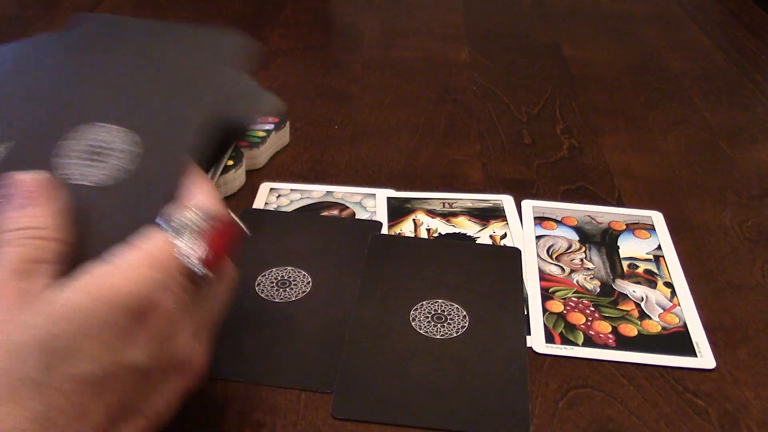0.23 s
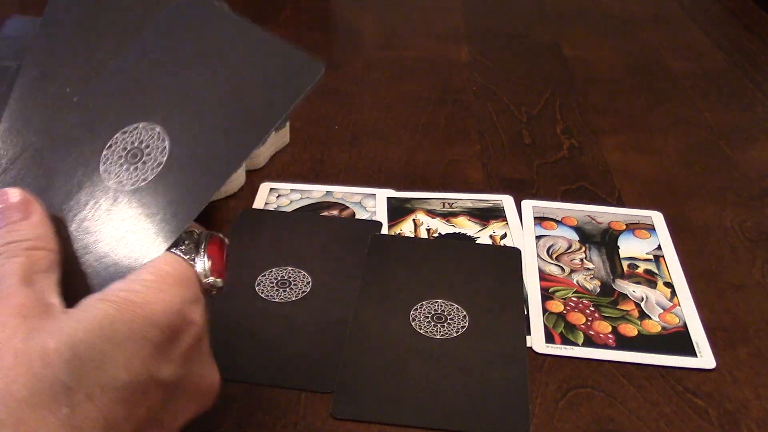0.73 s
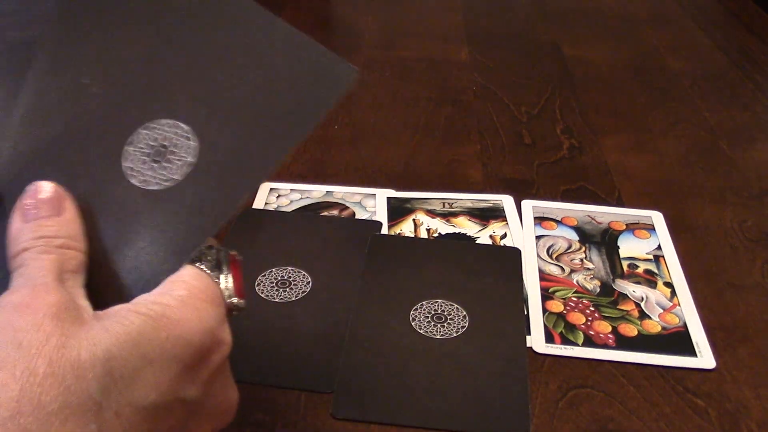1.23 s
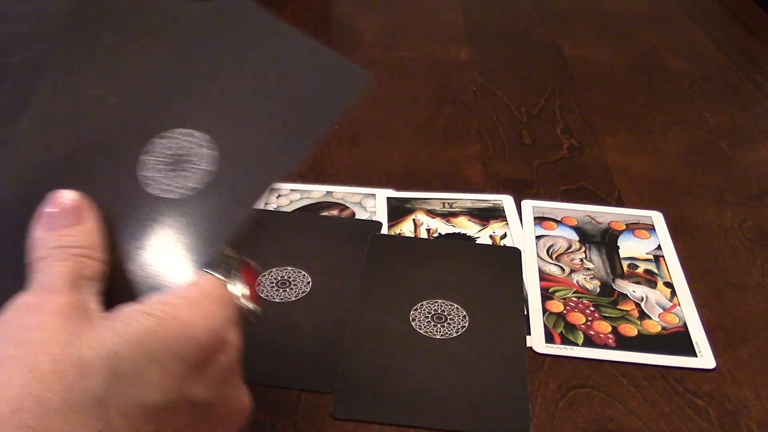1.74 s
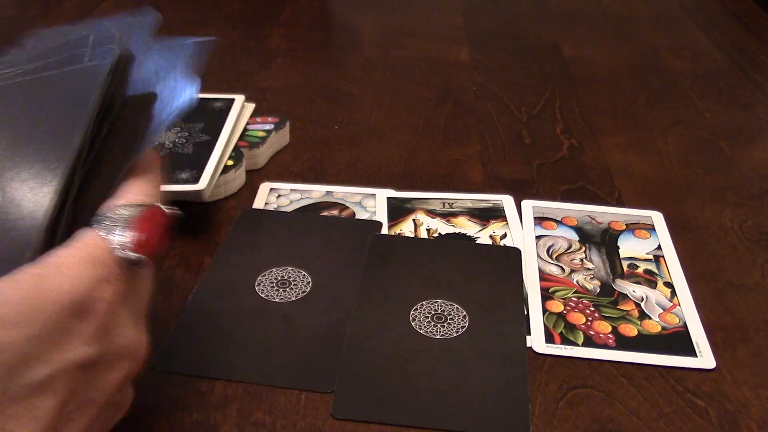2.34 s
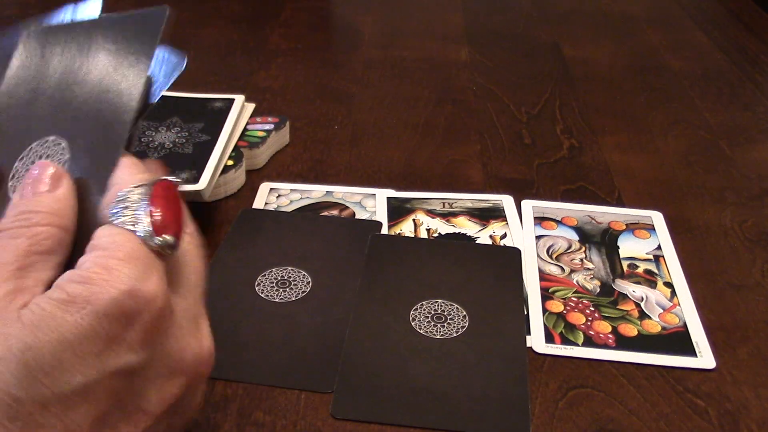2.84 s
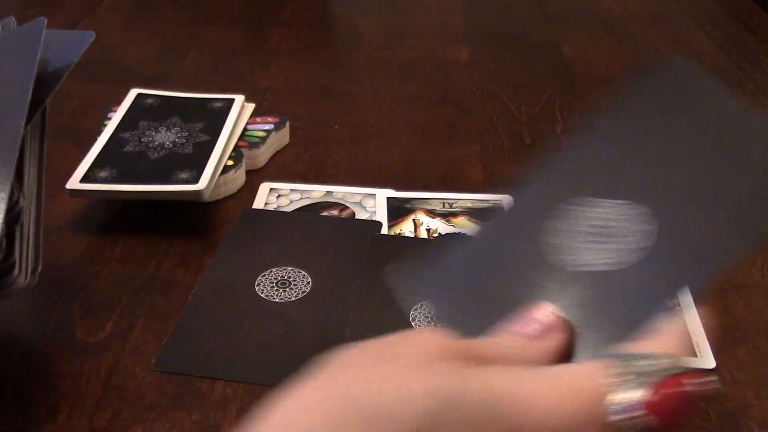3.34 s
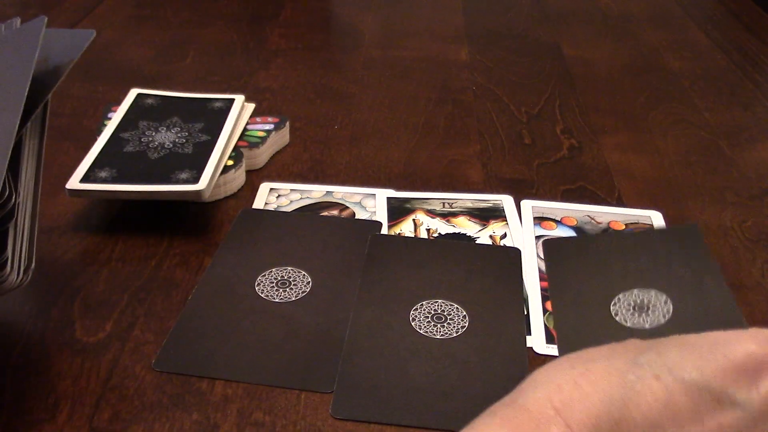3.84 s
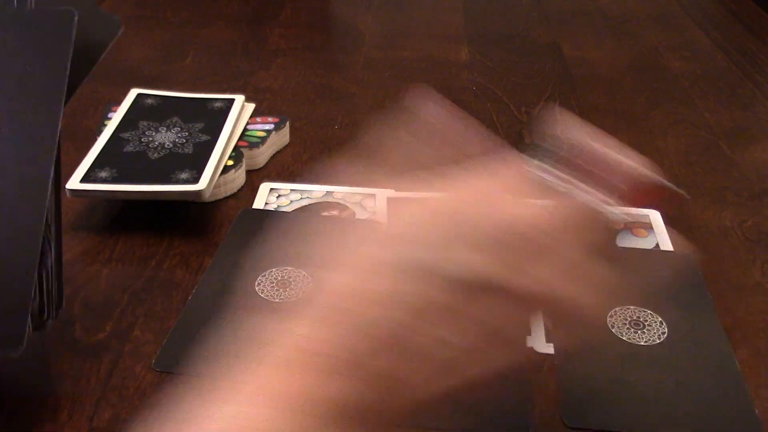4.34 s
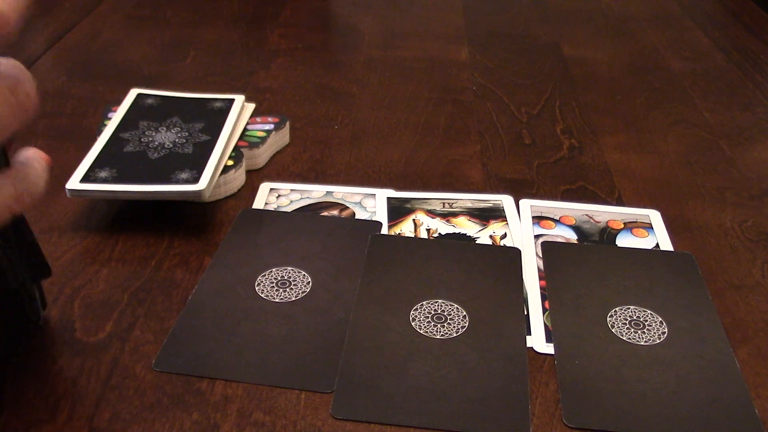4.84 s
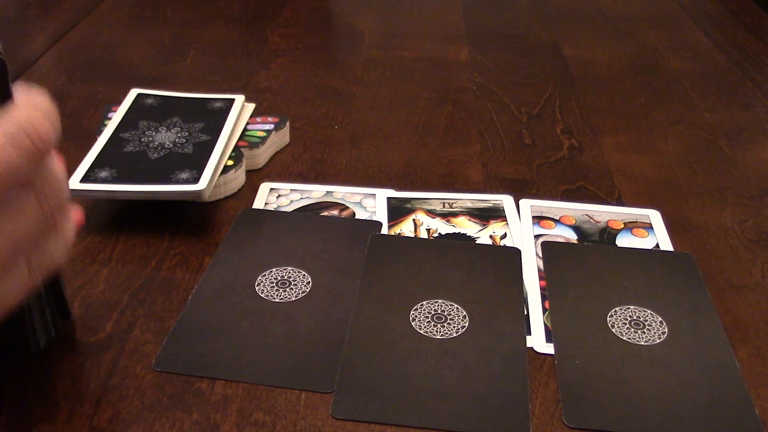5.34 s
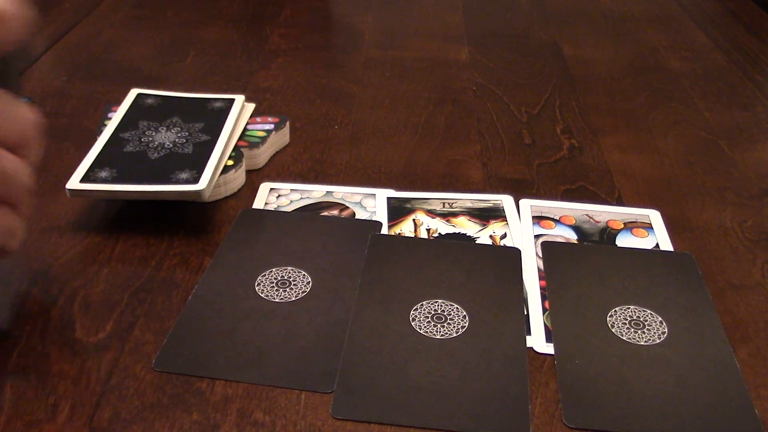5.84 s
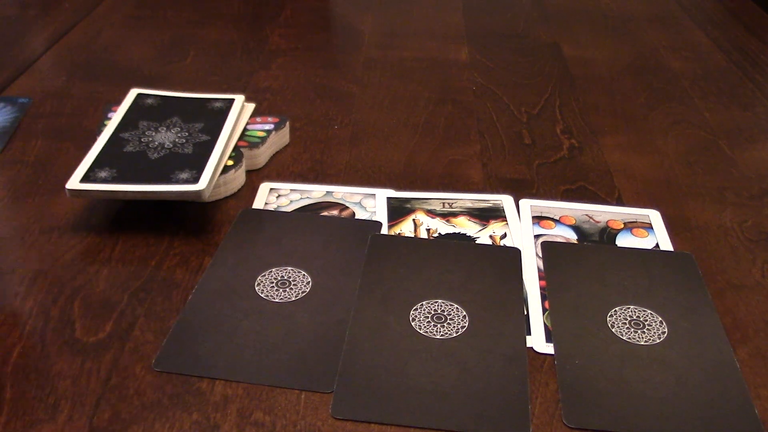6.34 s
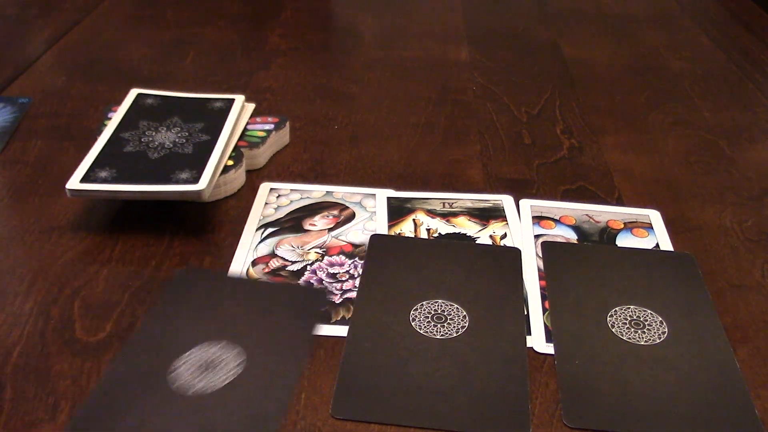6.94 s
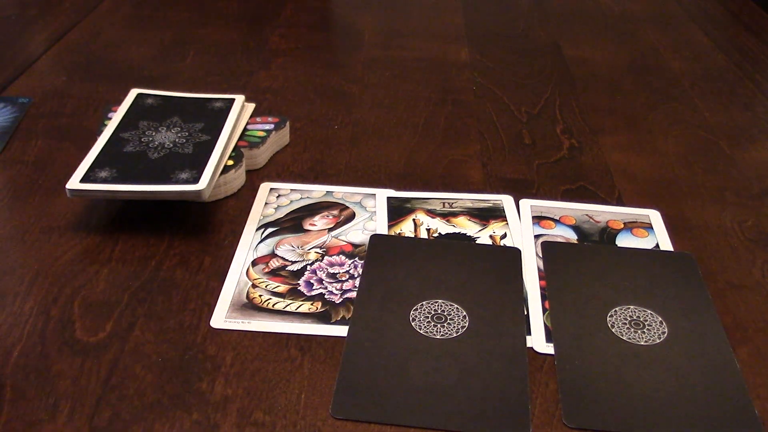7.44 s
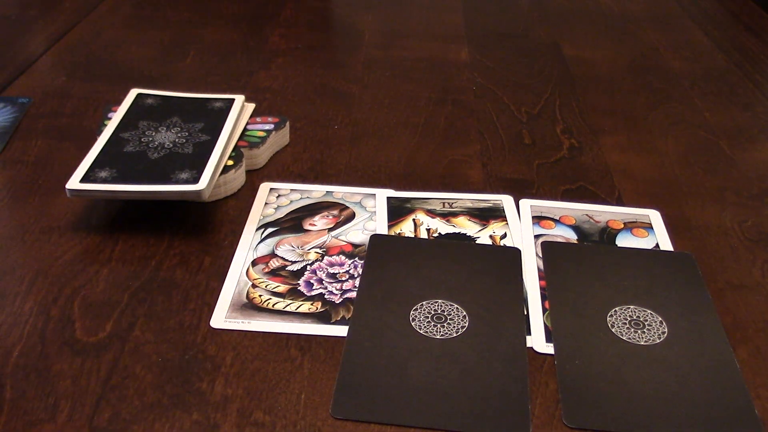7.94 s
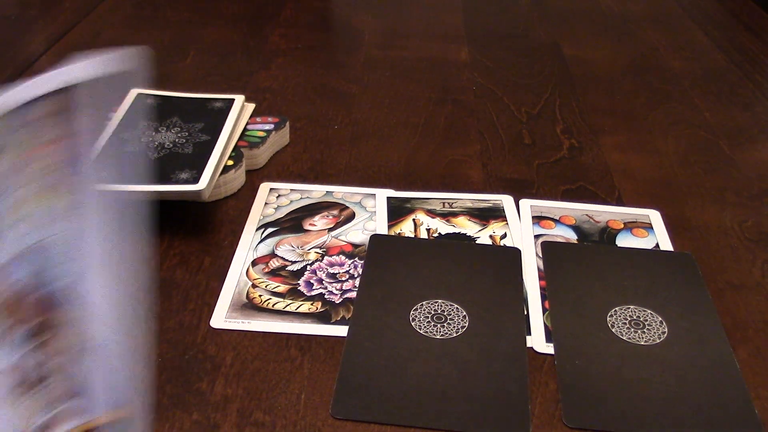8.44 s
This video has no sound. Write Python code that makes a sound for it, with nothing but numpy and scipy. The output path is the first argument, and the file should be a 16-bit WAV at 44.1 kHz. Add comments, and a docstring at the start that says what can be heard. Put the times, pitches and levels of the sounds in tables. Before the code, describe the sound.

In a quiet, humming room, cards rub, hiss and flick near the microphone, with light taps on a wooden table and a sharper slap. A short cluster of hollow, ringing knocks comes next, then more rustling and a firm thump as the deck is set down. One card is drawn away softly, a very high whine comes and goes, and small snaps finish.

```python
"""Tarot cards are dealt onto a wooden table, close by, in a quiet room with a steady hum and a faint whirr.
From the start, friction makes the cards rasp, hiss and swish off the deck, and bent edges snap free.
From 2.3 s, blows excite the modes of the table top; at 4.6 s something hollow is knocked and rings.
The deck thumps down at 6.2 s. One card is then drawn away over the others while a thin high whine
comes and goes (7.1 to 8 s), and a few light snaps end the scene."""
import sys
import numpy as np
from scipy import signal
from scipy.fft import rfft, irfft, next_fast_len
from scipy.io import wavfile

SR = 44100
rng = np.random.default_rng(int(sys.argv[2]) if len(sys.argv) > 2 else 0)


def wrap_up_sound(samples):
    """Save the sound to the file named by the first command line argument, as 16-bit audio."""
    columns = np.atleast_2d(samples).T
    # keep every value between -1 and 1, then stretch to whole-number steps
    tamed = np.clip(columns, -1, 1)
    steps = np.round(tamed * 32767).astype(np.int16)
    wavfile.write(sys.argv[1], SR, steps)


N = 383229
TIME = np.arange(N) / SR
RING_TIME = np.arange(SR) / SR


def amp(db):
    """Decibels to amplitude ratio."""
    return 10 ** (np.asarray(db) / 20)


def unit_energy(x):
    """Normalise to a total energy of one."""
    return x / np.sqrt(np.sum(x ** 2) + 1e-20)


def at_hz(points, hz):
    """Interpolate a table on a log-frequency axis."""
    table = np.array(points)
    return np.interp(np.log(np.maximum(hz, 1)), np.log(table[:, 0]), table[:, 1])


def add(track, s, sound):
    """Superpose a sound on a track at time s."""
    start = max(round(s * SR), 0)
    track[start:start + len(sound)] += sound[:max(N - start, 0)]


def tint(x, colour, tilt_db=0):
    """Minimum-phase filter with the given spectrum, tilted per octave above 500 Hz."""
    size = next_fast_len(2 * len(x), real=True)
    hz = np.maximum(np.fft.rfftfreq(size, 1 / SR), 20)
    gain_db = at_hz(colour, hz) + tilt_db * np.log2(np.maximum(hz, 500) / 2000)
    cepstrum = irfft(np.log(amp(gain_db)), size)
    cepstrum[1:size // 2] *= 2   # folding the cepstrum makes the filter causal
    cepstrum[size // 2 + 1:] = 0
    return irfft(rfft(x, size) * np.exp(rfft(cepstrum)), size)[:len(x)]


def soften(x, hz, order=2):
    """A compliant contact acts as a low-pass filter."""
    return signal.sosfilt(signal.butter(order, hz, fs=SR, output="sos"), x)


def resonate(x, hz, db):
    """A resonance lifts a narrow band around its frequency."""
    return x + (amp(db) - 1) * signal.lfilter(*signal.iirpeak(hz, Q=5.0, fs=SR), x)


def noise(colour):
    """Stationary noise with the given spectrum; rms 1."""
    size = next_fast_len(N, real=True)
    shaped = rfft(rng.standard_normal(size)) * amp(at_hz(colour, np.fft.rfftfreq(size, 1 / SR)))
    return unit_energy(irfft(shaped, size)[:N]) * np.sqrt(N)


def drift(rate):
    """Random fluctuation through `rate` values a second, with a spread near one."""
    return np.interp(TIME * rate, np.arange(N // 20), rng.standard_normal(N // 20))


def decay(t60, size=SR):
    """Exponential damping: 60 dB down after t60 seconds."""
    return np.exp(-np.log(1000) * RING_TIME[:size] / t60)


def contact(t60, scatter, size=SR):
    """An impulse followed by a decaying flurry of micro-impacts."""
    flurry = scatter * unit_energy(rng.standard_normal(size) * decay(t60, size))
    flurry[0] += 1
    return flurry


def ringing(modes):
    """Free vibration is a sum of damped modes, here alternating in sign; energy 1."""
    return unit_energy(sum((-1) ** k * amp(db) * decay(t60) * np.sin(2 * np.pi * hz * RING_TIME)
                           for k, (hz, db, t60) in enumerate(modes)))


# room noise spectrum: (frequency [Hz], relative level [dB])
AIR = [(25, -44), (45, -24), (80, -18.5), (110, -16.5), (170, -6), (260, -7), (400, -7.5), (600, -11),
       (800, -12.5), (1300, -21), (2500, -28.5), (6000, -35), (11000, -49.5), (16000, -48.5)]
# hum partials: (frequency [Hz], rms level [dB])
HUM = [(60, -75.5), (262, -61.5), (415, -53.5), (576, -63)]


def background():
    """Broadband room noise under a hum whose partials waver in amplitude and phase."""
    hum = sum(amp(db + 2.4 * drift(rate=7)) * np.sin(2 * np.pi * hz * TIME + 0.69 * drift(rate=7.3))
              for hz, db in HUM)
    return amp(-51.0) * noise(AIR) + np.sqrt(2) * hum


def whirr_pulse(period_s=.13347, peak_s=.054):
    """A rounded square wave between 0 and 1."""
    return .5 + .5 * np.tanh(2 * np.cos(2 * np.pi * (TIME - peak_s) / period_s))


def whirr(hz=5550, db=-71.5):
    """Amplitude modulation makes a faint electronic tone pulse."""
    return amp(db) * np.sqrt(2) * whirr_pulse() * np.sin(2 * np.pi * hz * TIME)


# restlessness of the fingers: (time [s], relative level [dB])
FIDGET = [(0, 0), (1.1, 0.5), (1.5, -2), (2.7, 5.5), (3.0, -4.5), (3.9, 0.5), (4.3, -0.5), (6.6, -8),
          (7.1, -0.5), (7.85, -3.5), (8.69, -1)]


def fidget():
    """Amplitude envelope of the small finger movements between strokes."""
    return amp(np.interp(TIME, *np.transpose(FIDGET)))


# spectrum of edge friction: (frequency [Hz], relative level [dB])
RASP = [(400, -28), (900, 4.5), (1700, 2), (3000, -2), (5000, -7), (8000, -10.5), (16000, -33.5)]


def ticks(per_second=8.2):
    """Edges catch and release under the fingers as a Poisson process."""
    caught = rng.random(N) < per_second / SR
    touches = caught * fidget() * amp(-37 + 5.5 * rng.standard_normal(N))
    tick = tint(contact(t60=.012, scatter=2.5, size=2048), RASP, tilt_db=-2.5)
    return signal.fftconvolve(touches, unit_energy(tick))[:N]


def flutter(t60, peel_s=0.00036, size=4096):
    """A noise transient builds as an edge peels free, then decays."""
    release = 1 - np.exp(-RING_TIME[:size] / peel_s)
    return unit_energy(rng.standard_normal(size) * release * decay(t60, size))


# card edges snapping: (time [s], level [dB], flutter T60 [s], tilt [dB/octave], room send [dB],
# card resonance [Hz])
SNAPS = [(0.1336, -6, 0.032, -0.5, -8.5, 2280), (0.1784, -9, 0.0036, -2.5, -8, 670),
         (0.4473, -7.5, 0.03, -2, -11, 2920), (0.555, -17.5, 0.013, -3.5, -7, 3150),
         (0.626, -36, .005, 9, -13, 12000), (1.999, 1.5, 0.011, 0.5, -12.5, 4130),
         (2.26, 0, 0.041, -2.5, -3.5, 2680), (2.276, -0.5, 0.01, -2, -4.5, 3930),
         (2.279, -1, 0.014, -1.5, -12, 1400), (2.2851, -3.5, 0.035, -0.5, -19, 2810),
         (2.41, -26, .005, 11, -18, 12000), (2.5729, -17, 0.035, -3.5, -4, 1520),
         (2.6206, -13, 0.0062, -3.5, -21, 2970), (2.8365, -16, 0.028, -1.5, -11, 2580),
         (3.1637, -1, 0.0039, -3, -20, 10000), (3.1677, 4, 0.012, -3, -9.5, 734),
         (3.28, -13, .012, -1.5, 0.5, 1600), (3.4433, -16, 0.035, 1.5, -19, 5030),
         (3.4513, -14.5, 0.011, -3, -4, 5070), (3.523, -16.5, 0.037, -2, -3.5, 1290),
         (3.753, -20.5, 0.023, -2, -19, 2830), (3.803, -14, 0.022, -1.5, -6.5, 2530),
         (4.098, 9, 0.0055, 1.9, -11.5, 5650), (4.101, 6.5, 0.0077, 0.5, -3.5, 890),
         (4.13, -2, 0.018, 1.5, -9, 820), (5.352, -8.5, 0.043, 1.5, -8, 1450),
         (5.4062, -15, 0.017, 0, -24, 1230), (6.216, -10.5, .02, -1.5, -2, 1215),
         (6.682, -13, 0.01, 2, -7, 5060), (8.062, -26, .012, -3, -4, 1750),
         (8.108, -26, 0.011, -1, -4, 3200), (8.158, -27, 0.012, -1, -9, 5540),
         (8.222, -25.5, 0.017, -2, -14, 1900), (8.678, -17, 0.082, -3, 4, 4400)]
# snap spectrum: (frequency [Hz], relative level [dB])
SNAP_SPECTRUM = [(100, -11), (300, -1.5), (650, 4), (1300, 2.5), (3500, -1), (7000, -5), (11000, -6.5),
                 (16000, -27)]


def snaps():
    """A bent edge releases its elastic energy at once; each snap has the reflections of its own spot."""
    out = np.zeros(N)
    for s, db, t60, tilt_db, room_db, note_hz in SNAPS:
        note_db = 8.5 - 0.13 * db   # the resonance stands out more in light snaps
        snap = tint(flutter(t60), SNAP_SPECTRUM, tilt_db)
        click = tint(signal.unit_impulse(1024), SNAP_SPECTRUM, tilt_db + 0.11)
        tail = signal.fftconvolve(resonate(click, note_hz, note_db / 2), reflections())
        add(out, s, amp(db) * unit_energy(resonate(snap, note_hz, note_db)))
        add(out, s, amp(db + room_db) * unit_energy(tail))
    return out


# reverberation time of the room: (frequency [Hz], T60 [s])
ROOM_T60 = [(100, 0.83), (400, 0.86), (1500, 0.67), (5000, 0.76), (10000, .45), (16000, 0.1)]


def reflections():
    """Impulse response of a diffuse field, each octave decaying at its own rate; energy 1."""
    tail = np.zeros(SR)
    edges_hz = 62.5 * 2 ** np.arange(9)
    white = rng.standard_normal((2, SR))
    for k, (low, high) in enumerate(zip(edges_hz, edges_hz[1:])):
        band = signal.sosfilt(signal.butter(2, [low, high], "band", fs=SR, output="sos"), white[k % 2])
        tail += band * decay(at_hz(ROOM_T60, np.sqrt(low * high)))
    build_up = 1 - np.exp(-RING_TIME / 0.00067)
    return unit_energy(tail * build_up)


def room(x):
    """A stationary source reverberates by convolution with one impulse response."""
    return signal.fftconvolve(x, reflections())[:N]


def stroke(s, db, rise, fall):
    """Friction noise follows hand speed: a Gaussian swell with separate rise and fall."""
    width = np.where(TIME < s, rise, fall)
    return amp(db) * np.exp(-np.minimum(((TIME - s) / width) ** 2, 20))


def together(gains):
    """Incoherent sources add in power."""
    return np.sqrt(sum(gain ** 2 for gain in gains))


def flexing(x, patchy_db):
    """Bending shifts a card's resonances, so narrow bands of its friction rise and sink; rms 1."""
    lifts = np.zeros(N)
    for hz in np.geomspace(2500, 12500, 12):
        band = signal.lfilter(*signal.iirpeak(hz, Q=8, fs=SR), x)
        lifts += (amp(patchy_db * drift(rate=22)) - 1) * band
    return unit_energy(x + lifts) * np.sqrt(N)


# card faces sliding: (time of top speed [s], relative level [dB], rise [s], fall [s])
SLIDES = [(0.14, -54.5, 0.0074, 0.12), (0.415, -58, .025, 0.022), (0.575, -57, 0.02, 0.071),
          (1.07, -53, .03, .03), (1.2, -58.5, .04, 0.027), (1.375, -55.5, .012, 0.078),
          (1.6, -48.5, 0.026, 0.011), (1.87, -53, .02, 0.091), (2.19, -54.5, 0.024, 0.12),
          (2.305, -40.5, .02, 0.042), (2.48, -56, .025, .015), (2.57, -55, .04, 0.04),
          (2.83, -50, .02, 0.016), (3.335, -45.5, 0.1, 0.081), (3.53, -50, .015, .025),
          (3.72, -63, 0.092, .12), (4.53, -51, .02, 0.16), (4.83, -52, 0.087, 0.16),
          (5.04, -46, 0.023, 0.036), (5.22, -47.5, 0.071, 0.071), (5.45, -44, 0.11, 0.025),
          (5.53, -44, 0.011, 0.012), (5.61, -51.5, 0.026, 0.034), (5.7, -52, 0.062, 0.027),
          (5.9, -58, 0.013, .04), (6.195, -44.5, 0.017, 0.026), (6.74, -55.5, .04, 0.19),
          (7.1, -52, 0.25, 0.11), (7.32, -56, 0.16, 0.16), (7.68, -63, 0.17, 0.14), (8.14, -54, .015, .015),
          (8.38, -66, 0.09, 0.13)]
# spectrum of face friction: (frequency [Hz], relative level [dB])
HISS = [(1500, -4.5), (4500, -10.5), (7000, -3.5), (10000, -2.5), (13000, -10), (16000, -19)]


def slides(catch, grain):
    """Sliding friction between smooth faces gives a fairly even hiss."""
    strokes = together(stroke(*row) for row in SLIDES)
    envelope = together([amp(-66) * fidget(), strokes])
    roughness = amp(-2.2 + 1.1 * catch + 1.6 * grain)
    return envelope * roughness * flexing(noise(HISS), patchy_db=3.0)


# edges scraping the deck: (time of top speed [s], relative level [dB], rise [s], fall [s], resonance [Hz])
SCRAPES = [(0.3, -47, .018, 0.014, 3400), (0.44, -45, 0.039, 0.023, 2800), (0.51, -48, 0.033, 0.081, 2800),
           (1.035, -40.5, .018, .014, 1600), (1.62, -51.5, 0.054, 0.055, 2600),
           (1.812, -49, 0.032, 0.023, 3000), (1.965, -45.5, 0.019, 0.032, 3000),
           (2.07, -49.5, .05, 0.075, 4000), (2.46, -50.5, 0.088, 0.14, 1960),
           (2.85, -49, 0.032, 0.022, 2600), (3.22, -49.5, .03, 0.15, 1500), (3.57, -50.5, .08, 0.025, 1490),
           (3.84, -57, 0.036, 0.074, 2500), (4.53, -45, 0.027, 0.12, 3000),
           (5.34, -49.5, 0.067, 0.09, 1400), (5.9, -58, .008, 0.023, 2500), (8.05, -49, 0.089, 0.048, 2870),
           (8.135, -46.5, 0.028, 0.016, 2700), (8.22, -50.5, .018, 0.014, 3100)]


def scrapes(catch, grain):
    """Uneven friction at an edge rasps and drives a resonance of the card."""
    friction = noise(RASP)
    rasp = amp(-58.5) * fidget() * noise(RASP)
    for s, db, rise, fall, note_hz in SCRAPES:
        coloured = resonate(friction, note_hz, db=9)
        rasp += stroke(s, db, rise, fall) * coloured / coloured.std()
    return rasp * amp(-4.0 + 2.5 * catch + 3.2 * grain)


# cards leaving the deck: (time of top speed [s], relative level [dB], rise [s], fall [s])
SWISHES = [(1.04, -45, 0.014, 0.027), (1.842, -33.5, 0.046, 0.014), (3.155, -34.5, 0.059, 0.015),
           (6.211, -49, 0.02, .006)]
# swish spectrum: (frequency [Hz], relative level [dB])
SWISH_SPECTRUM = [(400, -15.5), (1200, -3.5), (3000, 3), (5500, -2), (9000, -1.5), (12000, -7),
                  (16000, -18)]


def swishes(grain):
    """Fast sliding gives a short burst of broadband friction noise."""
    envelope = together(stroke(*row) for row in SWISHES)
    return envelope * amp(-3.5 + 2.3 * grain) * flexing(noise(SWISH_SPECTRUM), patchy_db=2.5)


def rubbing():
    """Surface roughness modulates card-on-card friction: slow catches and fine grain."""
    catch, grain = drift(rate=49), drift(rate=900)
    return scrapes(catch, grain) + slides(catch, grain) + swishes(grain)


# bent cards buzzing: (centre time [s], peak level [dB], frequency [Hz], half-width [s])
CHIRPS = [(1.9993, -19, 650, 0.001), (3.173, -28, 700, 0.0043), (3.175, -27, 1240, 0.0054),
          (3.198, -36, 500, 0.0085), (3.282, -24, 1620, 0.0032)]


def chirps():
    """Stick-slip oscillation lasting a few unsteady cycles."""
    out, t = np.zeros(N), RING_TIME[:SR // 5]
    for s, db, hz, half_width in CHIRPS:
        wander = np.cumsum(rng.standard_normal(len(t))) * 3.3 * hz / SR   # the slips keep no exact time
        swell = np.exp(-np.minimum(((t - t.mean()) / half_width) ** 2, 20))
        add(out, s - t.mean(), amp(db) * swell * np.sin(2 * np.pi * hz * t + wander))
    return out


# blows on the table: (time [s], level [dB], contact cut-off [Hz], relative ring [dB], bass cut-off [Hz])
THUMPS = [(2.2597, -14, 1500, -1, 160), (3.1680, -5, 1460, -3.5, 115), (4.1003, -1.5, 2500, -0.5, 226),
          (4.619, -7, 600, 8, 230), (4.76, -4, 800, 2, 190), (6.2162, 10, 2430, 5, 74.9),
          (6.2268, 2, 302, -3, 75), (6.684, -10.5, 3000, 3, 90)]
# modes of the table top: (frequency [Hz], relative level [dB], T60 [s])
TABLE_MODES = [(97, -16, 0.2), (120.5, -2, 0.54), (179.4, 0.5, 0.35), (221.8, 7, 0.29), (260, -16, 0.19),
               (324, -6.5, 0.13), (348, 0.5, 0.24), (457, -2.5, 0.28), (665, -29, 0.17)]
# spectrum of an impact on the wood: (frequency [Hz], relative level [dB])
TABLE_CLACK = [(50, -30.5), (100, -4), (300, 6), (600, -4.5), (1100, -8.5), (2500, -13.5), (6000, -23),
               (16000, -37)]


def thumps():
    """Impacts of hand and deck excite the low modes of the wooden top; returns clacks and rings."""
    clacks, rings = np.zeros((2, N))
    top = ringing(TABLE_MODES)
    for s, db, cut_hz, ring_db, low_hz in THUMPS:
        # a light blow barely moves the lowest modes
        bass_cut = signal.butter(2, low_hz, "high", fs=SR, output="sos")
        clack = unit_energy(tint(contact(t60=0.082, scatter=1.0), TABLE_CLACK))
        add(clacks, s, amp(db) * signal.sosfilt(bass_cut, soften(clack, cut_hz)))
        add(rings, s, amp(db + ring_db) * signal.sosfilt(bass_cut, soften(top, cut_hz)))
    return clacks, rings


# knocks on the hollow body: (time [s], relative level [dB], contact cut-off [Hz], spot resonance [Hz])
KNOCKS = [(4.6, 3.5, 1920, 1380), (4.6087, -2.5, 2150, 1250), (4.6173, 7.5, 1050, 670),
          (4.622, 3, 1300, 1050), (4.7482, 1.5, 2000, 1090), (4.756, 8.5, 4850, 3120),
          (4.7625, 11.5, 4180, 1660), (4.978, -6, 2200, 1400), (5.073, -1, 2200, 1180),
          (5.0809, 1, 2420, 1460), (5.0852, -4, 2200, 1180), (5.354, -7, 1590, 715),
          (5.385, -11, 1500, 1070)]
# modes of the hollow body: (frequency [Hz], relative level [dB], T60 [s])
HOLLOW_MODES = [(553, 0, 0.5), (616, 6, 0.24), (734, 6.5, 0.64), (1100, 10, 0.4), (1132, 9.5, 1),
                (1164, 4.5, 0.95), (1180, 8, 0.36), (1415, 3.5, 1), (1490, 4, 0.36), (1800, 9, 0.45),
                (1880, 3.5, 0.57), (2140, -2, 0.99), (2330, 7, 0.86), (2440, 10, 0.21), (2580, -25, 0.23),
                (2600, 7, 0.83), (2910, -7, 1), (3300, 6, 0.53), (3677, -40, 0.57), (3900, -15, .7),
                (4490, -16, 0.49)]
# spectrum of an impact on it: (frequency [Hz], relative level [dB])
HOLLOW_CLACK = [(80, -36), (200, -6.5), (600, 0), (1300, -0.5), (3400, -5.5), (5200, -11), (6300, -11.5),
                (16000, -14)]


def knocks():
    """Bouncing impacts excite a hollow body, harder ones its higher modes; returns clacks and rings."""
    clacks, rings = np.zeros((2, N))
    hz, mean_db, t60 = np.transpose(HOLLOW_MODES)
    for s, db, cut_hz, spot_hz in KNOCKS:
        mode_db = mean_db + 2.2 * rng.standard_normal(len(hz))   # each spot favours other modes
        clack = resonate(tint(contact(t60=0.036, scatter=3.0), HOLLOW_CLACK), spot_hz, db=5)
        damped = resonate(ringing(zip(hz, mode_db, 0.053 * t60)), spot_hz, db=13.5)
        free = ringing(zip(hz, mode_db, t60))
        ring = amp(-3.5) * unit_energy(damped) + amp(-9.0) * free   # the touch damps most of it at once
        add(clacks, s, amp(db) * soften(unit_energy(clack), cut_hz, order=4))
        add(rings, s, amp(db) * soften(ring, cut_hz, order=4))
    return clacks, rings


# tones of the whine: (start [s], end [s], frequency [Hz], rms level [dB])
WHINE = [(7.12, 7.57, 15395, -52), (7.57, 8.0, 15628, -54)]


def whine():
    """A pure tone near the upper limit of hearing steps up once in frequency."""
    out = np.zeros(N)
    for on, off, hz, db in WHINE:
        gate = np.interp(TIME, [on - .01, on + .03, off - .01, off + .03], [0, 1, 1, 0])
        out += amp(db) * np.sqrt(2) * gate * np.sin(2 * np.pi * hz * TIME)
    return out


# where the cards are handled: (time [s], left minus right level [dB])
HAND_PAN = [(0, 1), (2.3, 0.9), (3.1, 1.5), (3.3, 0.5), (4.1, -0.3), (4.5, 1), (8.6, 1.6)]
# hiss that differs between the sides: (frequency [Hz], relative level [dB])
SIDE_HISS = [(25, -12), (60, -11), (170, -0.5), (400, 0), (800, -6.5), (1400, -11.5), (3100, -18),
             (6000, -30), (11000, -37), (16000, -38)]


def scene():
    """Level differences place the cards at the hand, the rest slightly left; a side signal adds width."""
    thump, table_ring = thumps()
    knock, hollow_ring = knocks()
    rub, snap = rubbing(), snaps()
    sent = amp(-7.5) * thump + amp(-4.0) * knock + amp(-10.5) * rub
    cards = snap + rub + chirps() + ticks()
    impacts = thump + table_ring + amp(-1.5) * knock + hollow_ring
    rest = impacts + room(sent) + background() + whine() + whirr()
    side = amp(-21.5) * room(sent + amp(-13.0) * cards)
    side += amp(-61.5 + 0.81 * whirr_pulse()) * noise(SIDE_HISS)
    # close sounds reach the two sides a fraction of a sample apart
    side += np.gradient(amp(-15.5) * snap + amp(-20) * rub + amp(-7.5) * (knock + thump))
    left_right = np.array([[1], [-1]])
    pan_db = np.interp(TIME, *np.transpose(HAND_PAN))
    return cards * amp(left_right * pan_db / 2) + rest * amp(left_right * 0.39) + left_right * side


def record(dry):
    """Band limiting and saturation: the microphone sheds deep bass, clips at full scale and cuts the top."""
    bass_cut = signal.butter(2, 55, "high", fs=SR, output="sos")
    treble_cut = signal.ellip(10, .1, 80, 15900, fs=SR, output="sos")
    clipped = np.clip(signal.sosfilt(bass_cut, dry), -1, 1)
    return signal.sosfilt(treble_cut, clipped)


dry = scene()
out = record(dry)
wrap_up_sound(out)
```